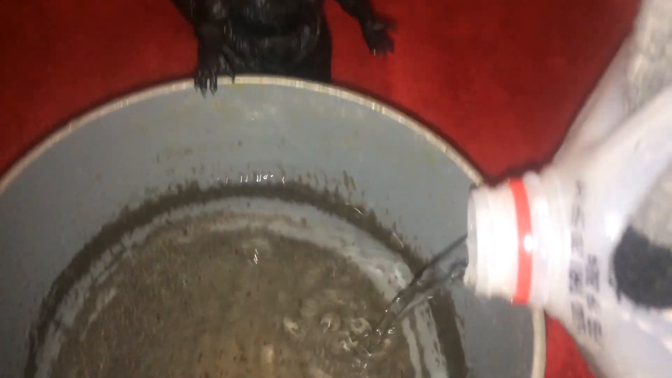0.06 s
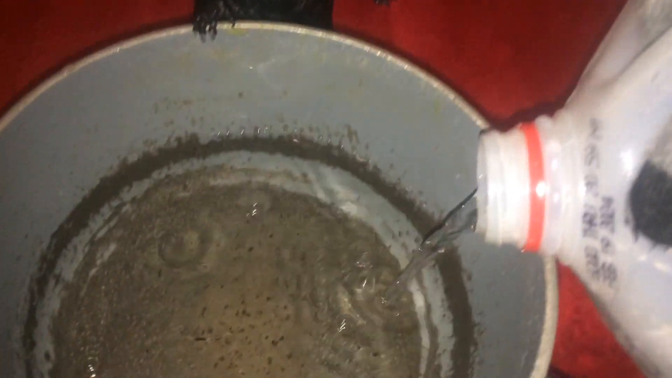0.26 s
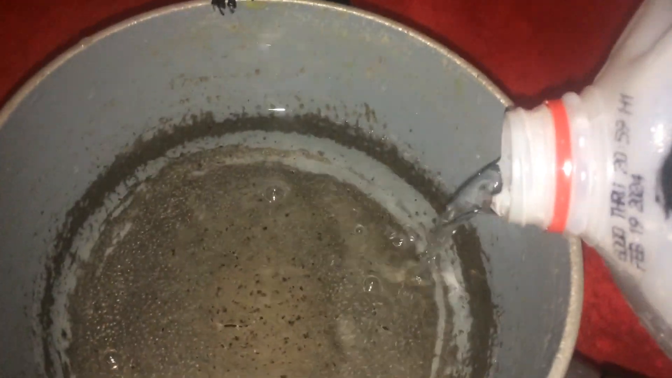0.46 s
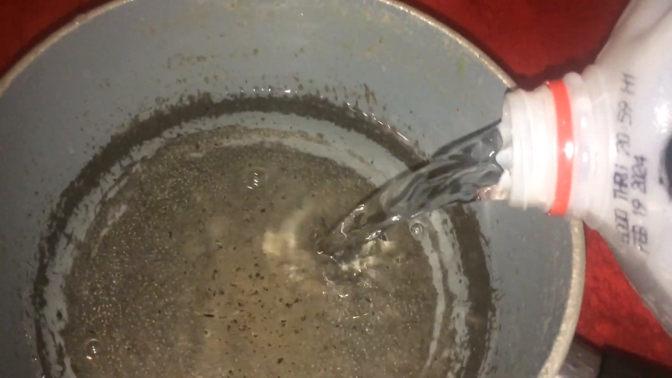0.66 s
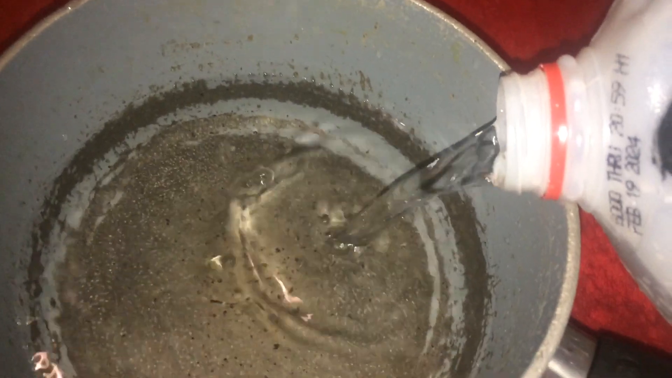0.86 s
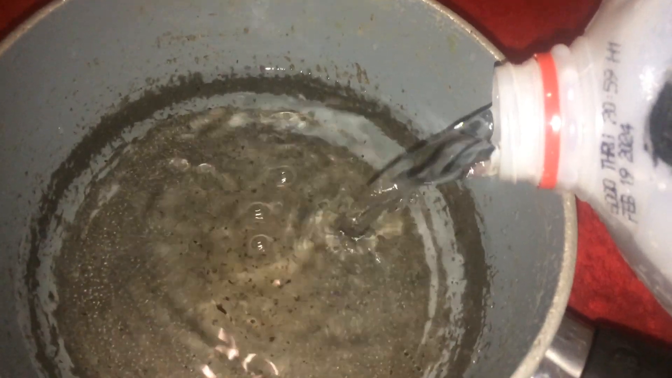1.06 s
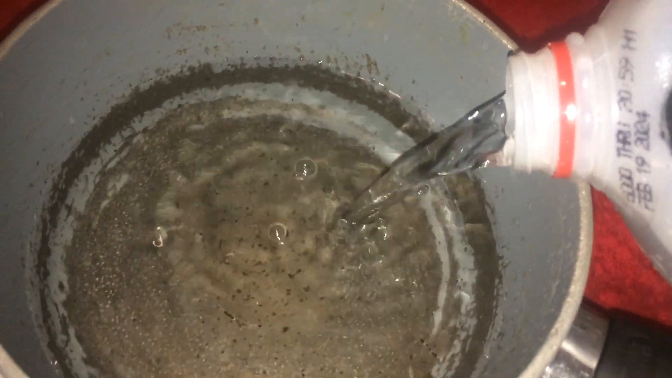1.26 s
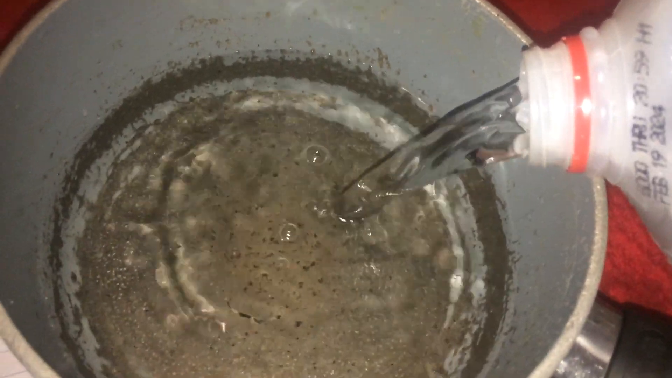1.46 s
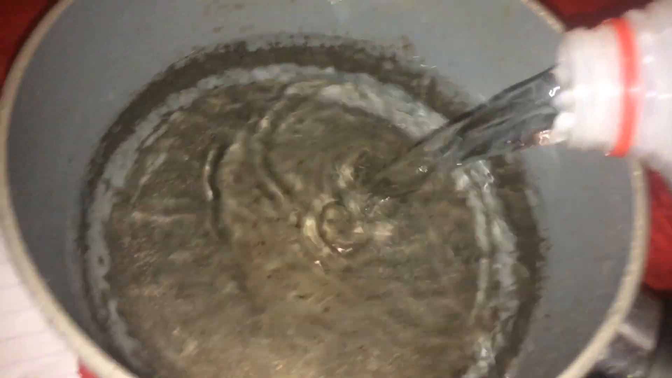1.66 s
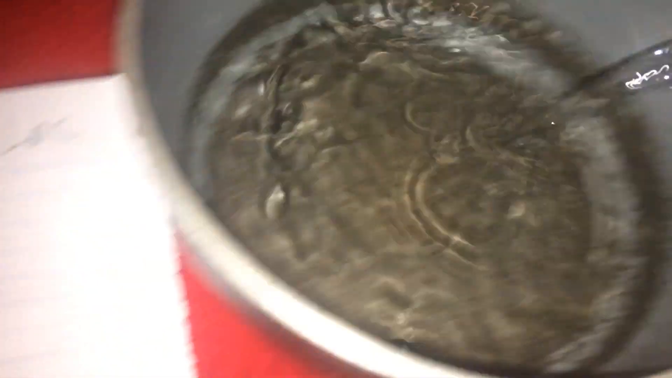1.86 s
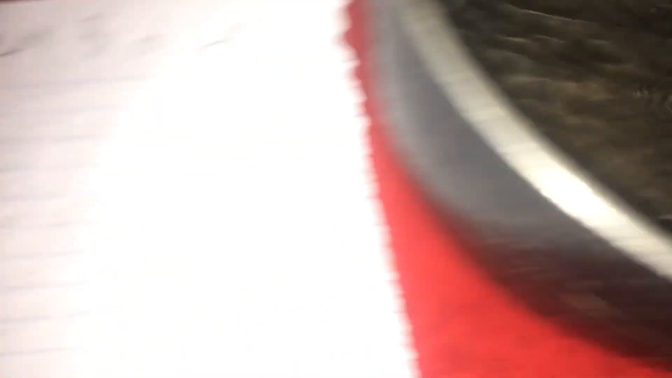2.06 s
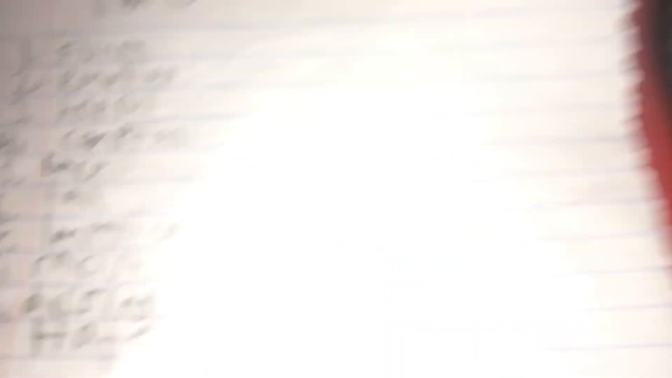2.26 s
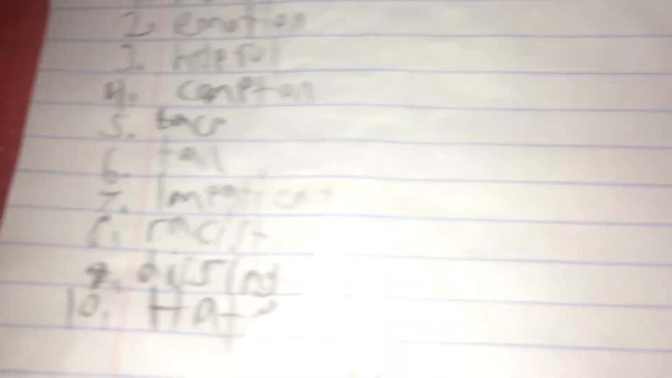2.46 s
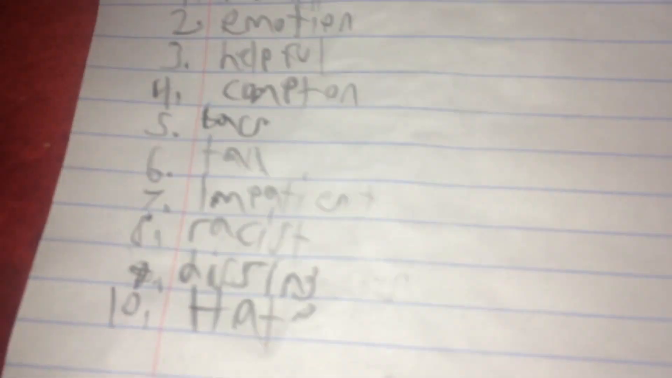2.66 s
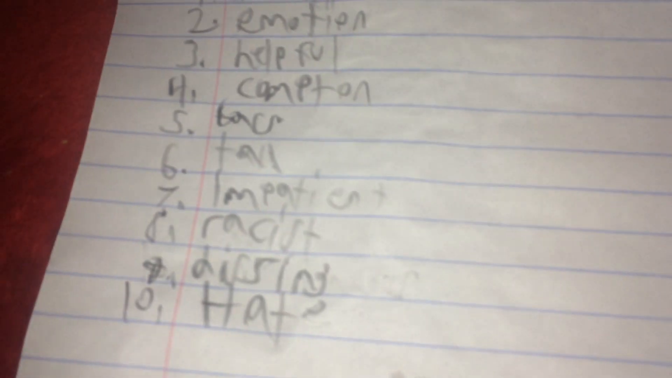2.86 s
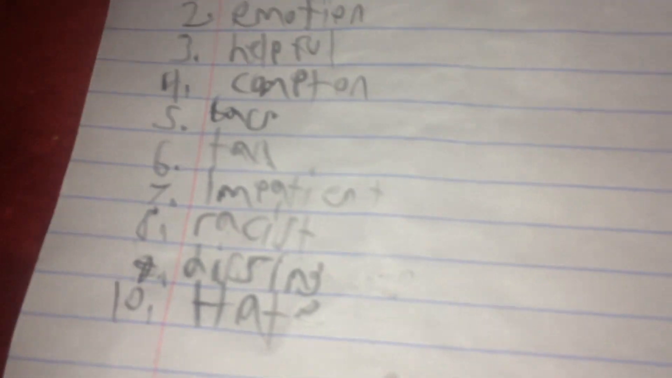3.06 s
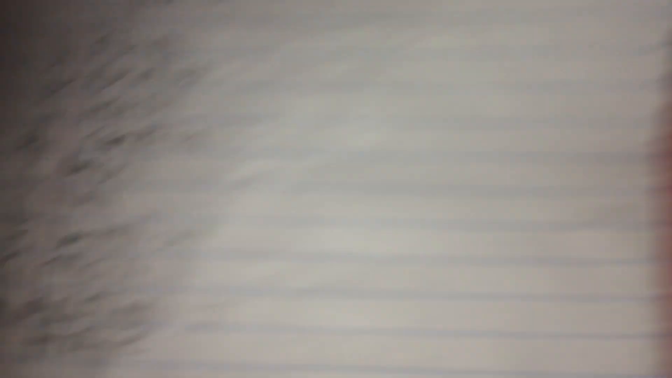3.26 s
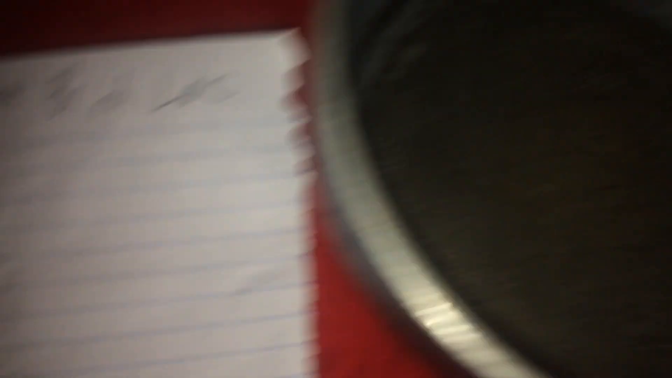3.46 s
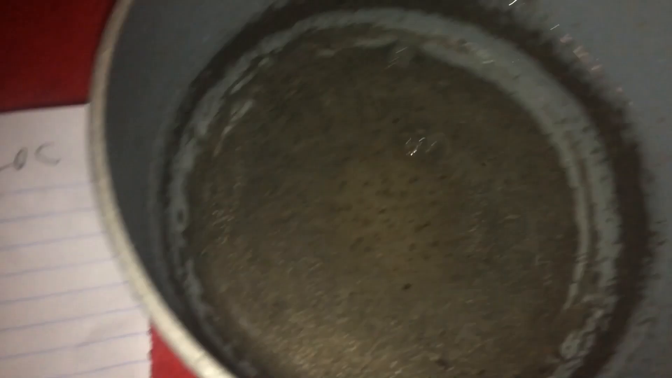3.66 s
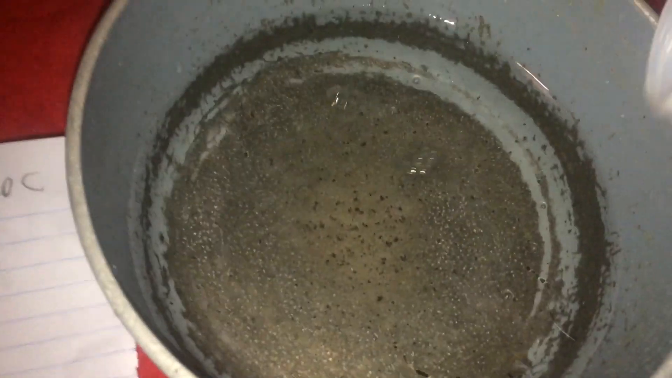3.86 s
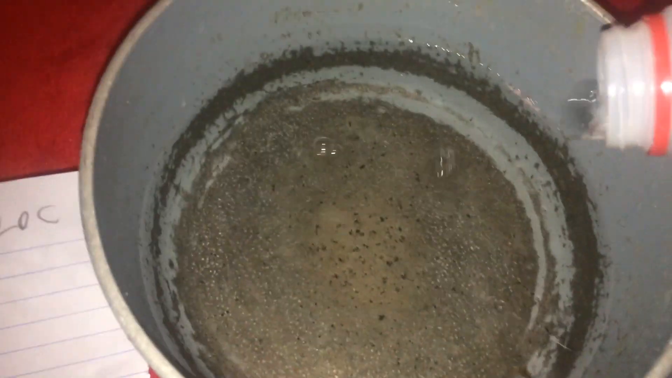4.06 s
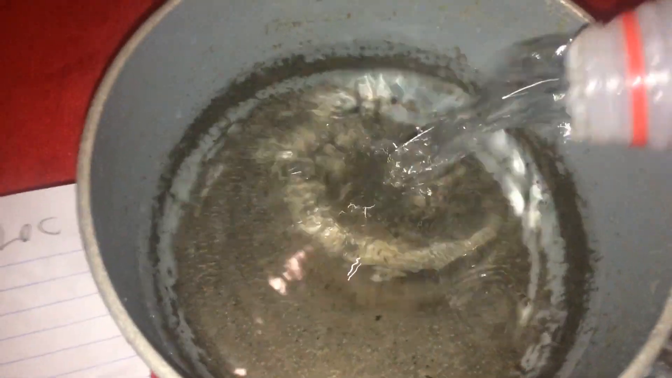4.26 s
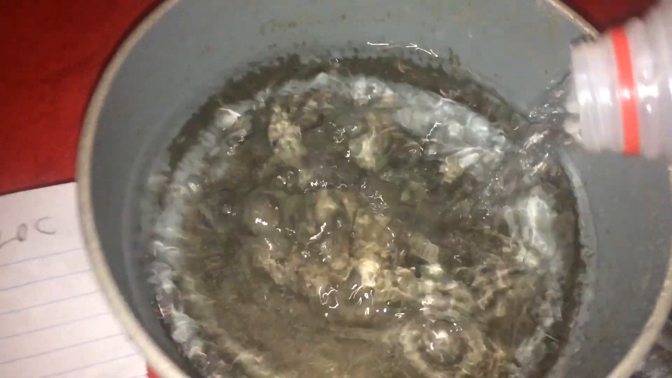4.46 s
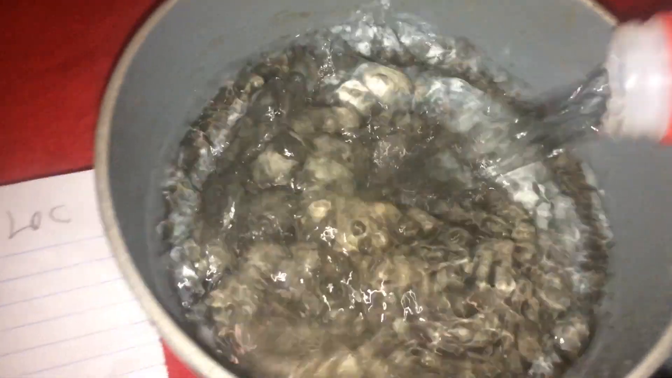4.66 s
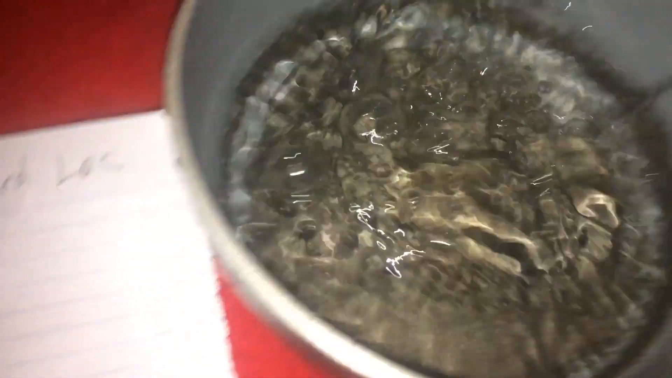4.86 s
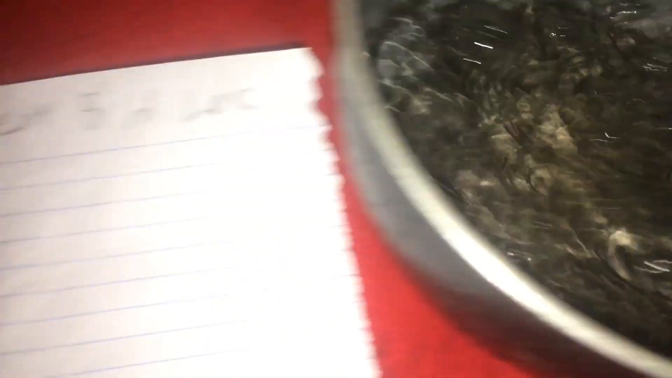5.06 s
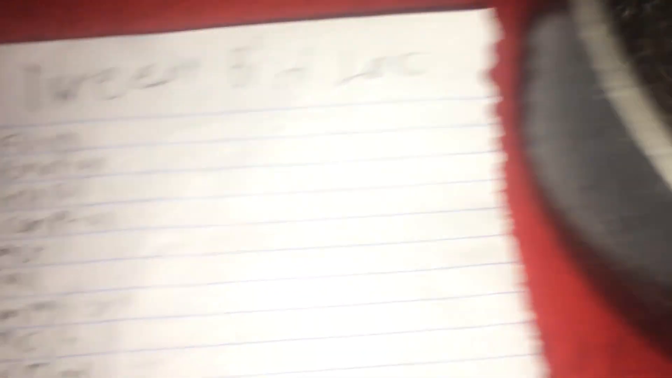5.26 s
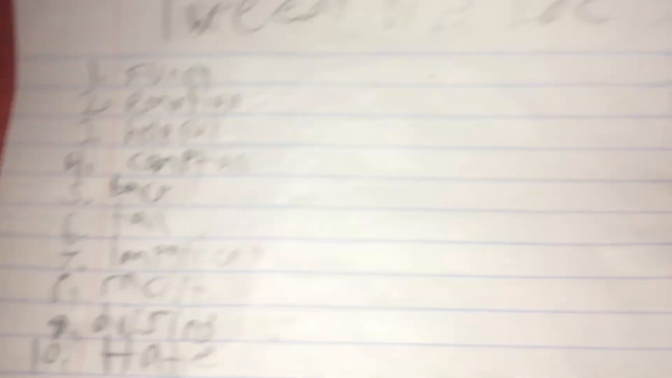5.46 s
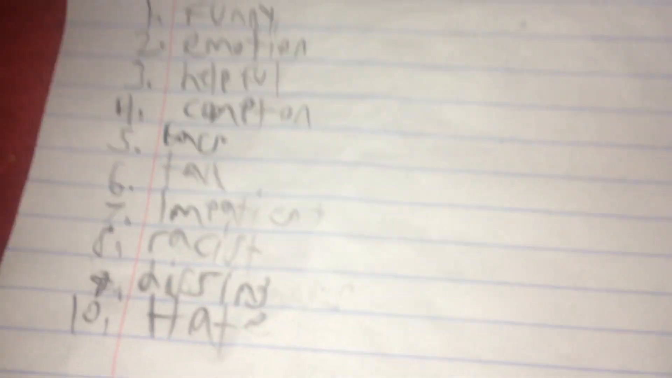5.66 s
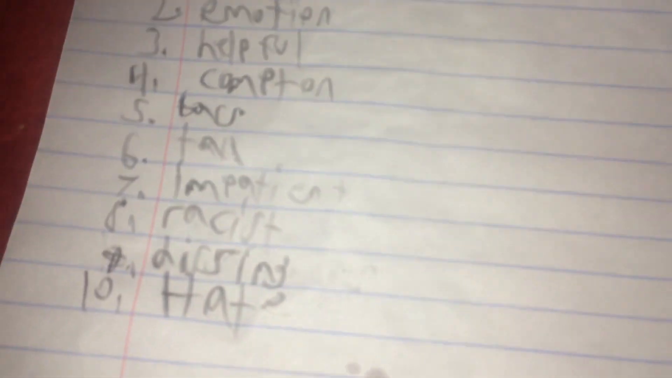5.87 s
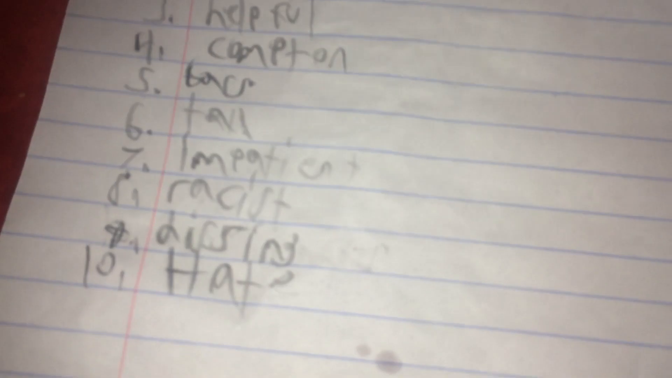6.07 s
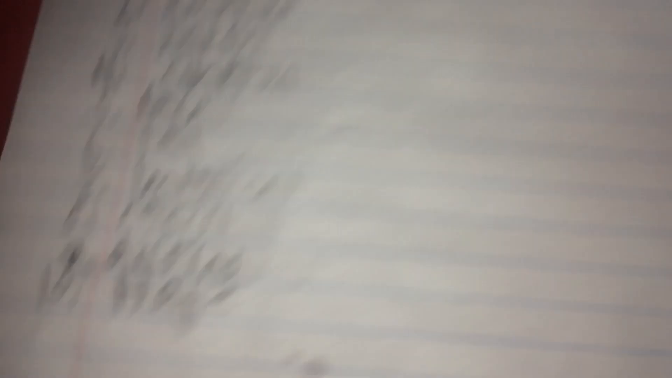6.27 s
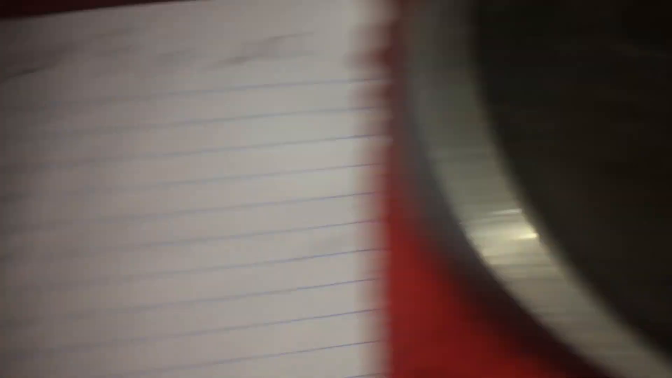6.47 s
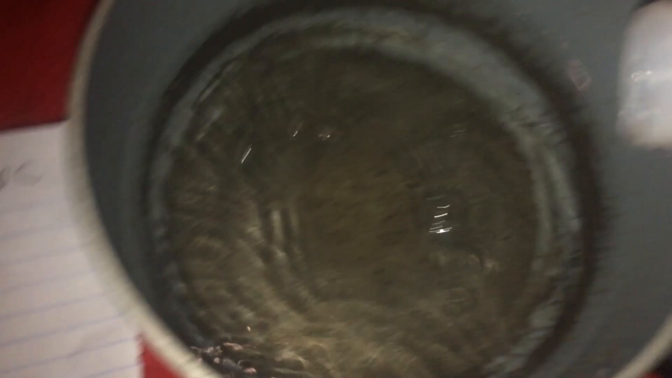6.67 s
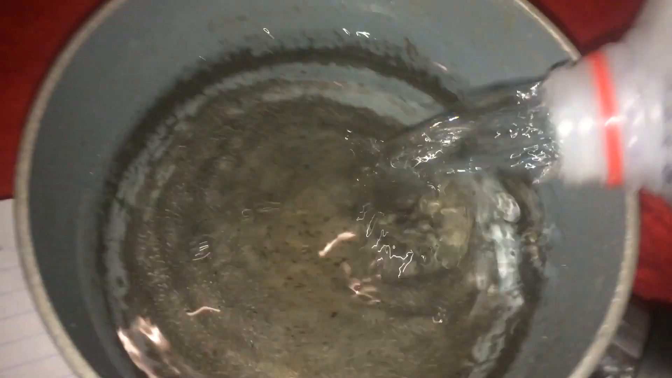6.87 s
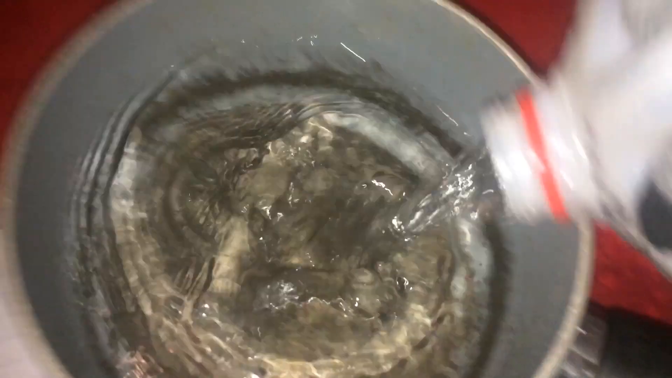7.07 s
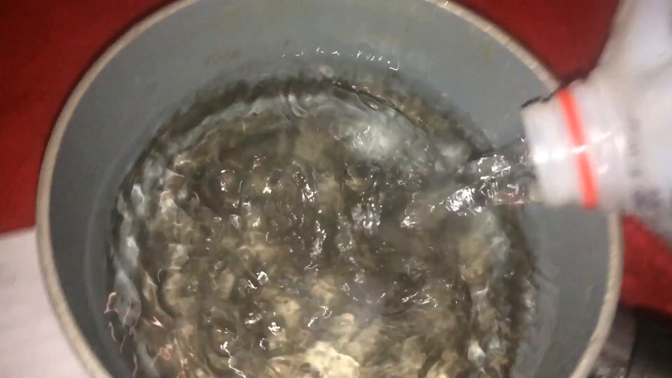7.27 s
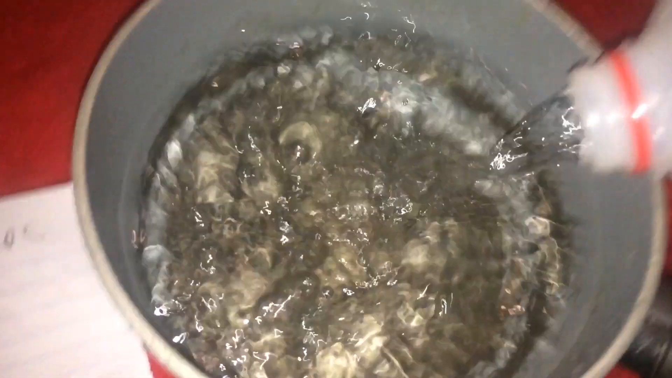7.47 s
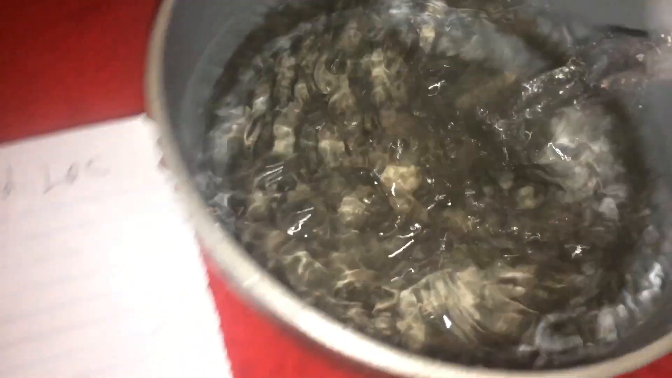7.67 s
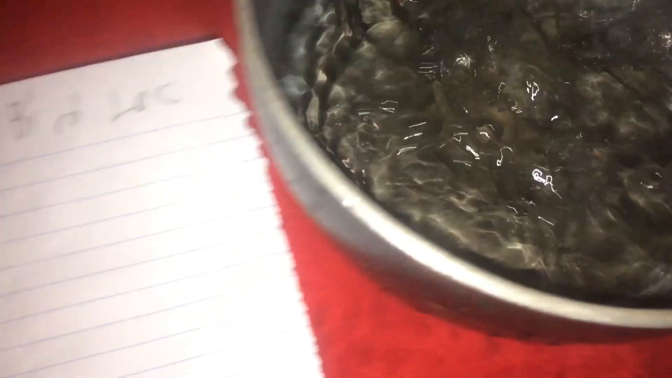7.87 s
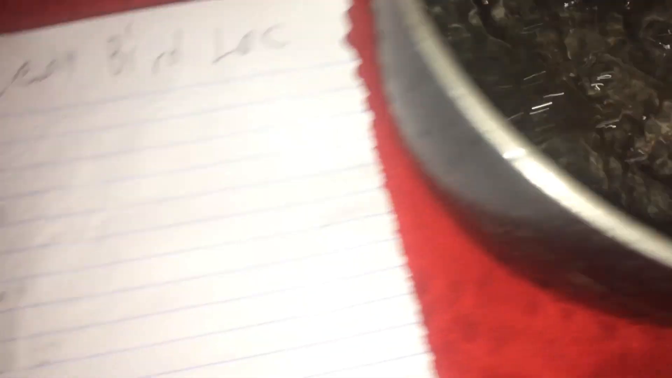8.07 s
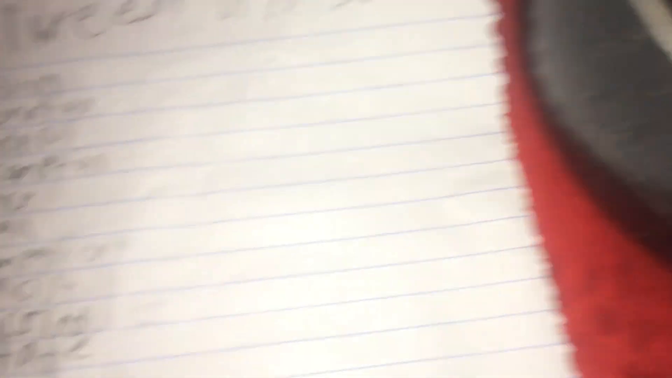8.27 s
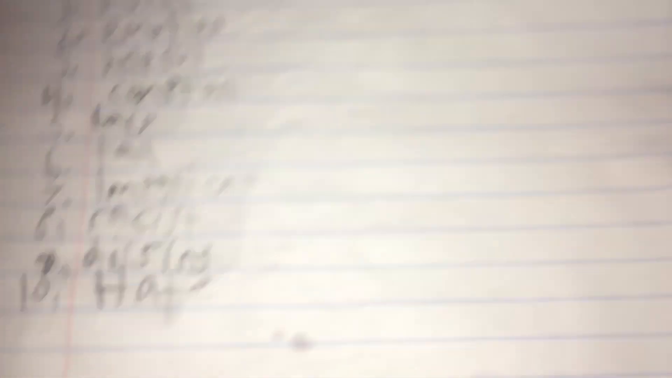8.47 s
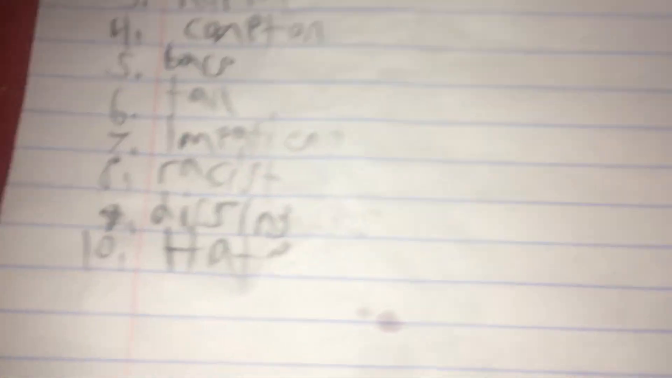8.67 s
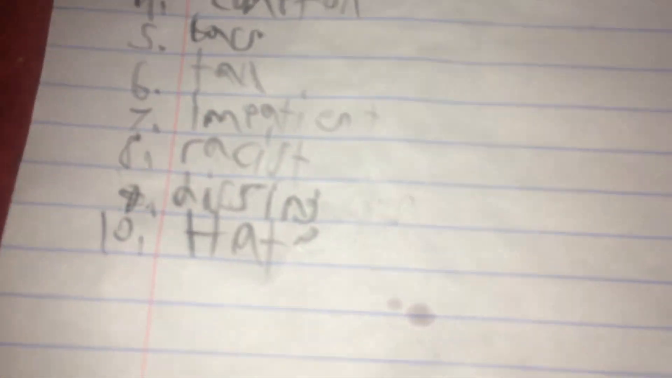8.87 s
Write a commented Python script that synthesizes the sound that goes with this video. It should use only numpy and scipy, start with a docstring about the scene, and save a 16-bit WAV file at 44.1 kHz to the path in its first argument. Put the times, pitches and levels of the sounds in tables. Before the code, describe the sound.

Water trickles from a plastic bottle into a metal pot, then glugs out in two splashing gushes, with knocks on the rim.

```python
"""A refrigerator hums and throbs in a small room while water is poured from a plastic bottle into a metal pot.
First comes a thin trickle of pinging bubbles and ticking drops. The bottle knocks and rubs on the rim,
and at 4.3 s a gush glugs out: slugs of water slap the pool and shake the pot, bubbles ring and rise in
pitch, spray crackles. The pool settles; more knocks and a thud through the table lead into a bigger gush
at 7 s, which laps and fizzes away under a last soft thud."""
import sys
import numpy as np
from scipy import signal
from scipy.fft import rfft, irfft
from scipy.io import wavfile

SR = 44100
rng = np.random.default_rng(int(sys.argv[2]) if len(sys.argv) > 2 else 0)


def dump_mix(stems):
    """Bounce the given channels to the path in sys.argv[1] as a 16-bit WAV at rate SR."""
    frames = np.atleast_2d(stems).T  # one column per channel
    limited = np.clip(frames, -1, 1)  # hard clip at full scale
    pcm = np.round(limited * 32767).astype(np.int16)
    wavfile.write(sys.argv[1], SR, pcm)


N = 393813

# small bubbles: t/s, level/dB, f/Hz
SMALL_BUBBLES = [(0.017, -29, 820), (0.02, -22.5, 10160), (0.043, -38, 3220), (0.269, -34, 6200),
                 (0.319, -37.5, 3300), (0.698, -41.5, 2580), (0.741, -33, 8950), (0.768, -35, 1450),
                 (0.771, -40, 6250), (0.795, -37, 7600), (1.212, -35, 7900), (1.239, -45.5, 2560),
                 (1.239, -40, 6940), (1.432, -43.5, 9000), (1.479, -47, 7100), (1.71, -40.5, 2650),
                 (1.785, -48, 2100), (1.784, -42.5, 6060), (1.823, -39, 5080), (2.067, -35, 3560),
                 (2.069, -35, 10800), (2.195, -26, 9640), (2.206, -48, 4150), (2.225, -27, 6040),
                 (3.795, -41.5, 9450), (4.339, -30, 2700), (4.469, -8, 1920), (4.469, -18, 2900),
                 (4.482, -14.5, 2780), (4.501, -5, 9170), (4.518, -12, 8050), (4.57, -10.5, 5400),
                 (4.574, -11.5, 2700), (4.688, -17, 2610), (4.71, -27, 2430), (4.739, -16, 1450),
                 (4.745, -21.5, 2930), (4.958, -27.5, 6000), (5.127, -18.5, 9040), (7.046, -19.5, 4050),
                 (7.133, -15.5, 2550), (7.142, -8, 3010), (7.149, -5, 9550), (7.152, -16.5, 3940),
                 (7.173, -8.5, 2760), (7.186, -16, 1614), (7.227, -16, 3580), (7.227, -13.5, 10800),
                 (7.232, -12, 5260), (7.243, -18.5, 1720), (7.248, -12.5, 6350), (7.28, -8.5, 1240),
                 (7.392, -11, 1130), (7.467, -19, 2700), (7.495, -23, 2590), (7.501, -16.5, 6240),
                 (7.527, -11.5, 925), (7.655, -31.5, 3800), (7.675, -3.5, 1344), (7.849, -19.5, 3310),
                 (7.866, -28, 3200), (7.905, -14.5, 8890), (7.916, -5.5, 2800), (7.921, -10, 9300),
                 (7.936, -24, 920), (7.953, -22.5, 3320), (8.005, -15.5, 7700), (8.034, -26, 3160),
                 (8.175, -29, 3270), (8.323, -38, 2870), (8.414, -28.5, 4620)]
# the pot's low modes, damped by the water: f/Hz, level/dB, t60/s
POT_LOW_MODES = [(72, -12.5, 0.085), (148.5, 1, 0.053), (197, 4, 0.081), (224.1, -2, 0.091),
                 (266, 0.5, 0.064), (321, -1, 0.045), (426, -0.5, 0.054), (503, -8.5, 0.016)]


def from_db(db):
    """Decibels to gain."""
    return 10 ** (np.asarray(db) / 20)


def unit_rms(x):
    """Scale to an rms of 1."""
    return x / np.sqrt(np.mean(x ** 2) + 1e-20)


def fader(points):
    """Gain that follows points of t/s, level/dB."""
    times, levels_db = np.transpose(points)
    return from_db(np.interp(np.arange(N) / SR, times, levels_db))


def coloured_noise(spectrum):
    """Noise shaped by points of f/Hz, level/dB."""
    hz, level_db = np.transpose(spectrum)
    grid_hz = np.maximum(np.arange(N // 2 + 1) * SR / N, 1)
    gain = from_db(np.interp(np.log(grid_hz), np.log(hz), level_db))
    return irfft(rfft(rng.standard_normal(N)) * gain, N)


def band(x, low_hz, high_hz):
    """Butterworth band-pass."""
    return signal.sosfilt(signal.butter(2, [low_hz, high_hz], "band", fs=SR, output="sos"), x)


def drift(rate_hz):
    """Smooth random wander of spread 1."""
    pole = np.exp(-80 * np.pi * rate_hz / SR)
    slow = signal.lfilter([1], [1, -2 * pole, pole * pole], rng.standard_normal(N // 40 + 2002))[2000:]
    return np.interp(np.arange(N) / 40, np.arange(len(slow)), unit_rms(slow))


def bursts(times, levels_db, t60, rise_s):
    """Envelope that jumps at each time and dies away."""
    clicks = np.zeros(N)
    np.add.at(clicks, (times * SR).astype(int), from_db(levels_db))
    decays = signal.lfilter([1], [1, -from_db(-60 / (t60 * SR))], clicks + 1e-18)
    soft = np.exp(-1 / (rise_s * SR))
    return signal.lfilter([1 - soft], [1, -soft], decays)


def swells(rows, rise_db_per_s, fall_db_per_s):
    """Envelope that climbs to each level, holds and falls away."""
    t = np.arange(N) / SR
    return sum(from_db(db - rise_db_per_s * np.maximum(s - t, 0)
                       - fall_db_per_s * np.maximum(t - s - hold, 0)) for s, hold, db in rows)


def resonate(force, modes):
    """A force rings damped modes of alternating sign."""
    out = np.zeros(N)
    for k, (hz, level_db, t60) in enumerate(modes):
        r, w = from_db(-60 / (t60 * SR)), 2 * np.pi * hz / SR
        ring = signal.lfilter([0, np.sin(w)], [1, -2 * r * np.cos(w), r * r], force + 1e-18)
        out += (-1) ** k * from_db(level_db) * ring
    return out


def add_ping(out, s, hz, gain, t60, glide):
    """Mix in a sine that swells quickly and dies while its pitch moves by the share `glide`."""
    t = np.arange(int(t60 * SR)) / SR
    envelope = (1 - np.exp(-t / (0.6 / hz + .0004))) * from_db(-60 * t / t60)
    tone = np.sin(2 * np.pi * hz * (t + glide / 2 * t * t / t60))
    start = int(s * SR)
    out[start:start + len(t)] += (gain * envelope * tone)[:N - start]


def fridge():
    """Compressor hum and casing rattle throb together as the rotor slips against the mains field."""
    # compressor lines: f/Hz, level/dB
    hum_lines = [(59.2, -16), (119.8, 3.5), (177.6, -9.5), (239.6, -21), (359.6, -16.5), (479, -32.5)]
    # bands of the casing rattle: low f/Hz, high f/Hz, level/dB
    rattle_bands = [(1150, 2000, -24), (3060, 3100, -37)]
    # slow ride of the overall level: t/s, level/dB
    level_ride = [(0, -58), (1.5, -56), (2, -52.5), (3.5, -52.5), (3.9, -55.5), (5, -52.5), (8.93, -54)]
    mains_hz, slip_hz, crest_s = 59.85, 1.87, 4.485
    t = np.arange(N) / SR
    throb = np.cos(2 * np.pi * slip_hz * (t - crest_s))
    hum = sum(from_db(level_db + drift(5.1)) * (1 + (.75 if hz > 300 else .22) * throb)
              * np.sin(2 * np.pi * (hz * t + rng.random())) for hz, level_db in hum_lines)
    taps = np.diff(np.floor(mains_hz * t), prepend=0) + .045 * rng.standard_normal(N)   # one per cycle
    rattle = sum(from_db(db) * unit_rms(band(taps, low, high)) for low, high, db in rattle_bands)
    return fader(level_ride) * (np.sqrt(2) * hum + (1 + throb) * rattle)


def room_air():
    """A faint, bass-heavy bed of room tone."""
    # spectrum of the air: f/Hz, relative level/dB
    air_spectrum = [(20, -38.5), (33, -23), (42, -8.5), (60, -3.5), (85, -7), (200, -15), (400, -25.5),
                    (600, -25.5), (3000, -35), (12000, -42.5), (16500, -46.5)]
    return from_db(-63.5) * unit_rms(coloured_noise(air_spectrum))


def splash_noise():
    """Mid-heavy noise, the raw stuff of splashes, knocks and rubs."""
    # spectrum of a splash: f/Hz, relative level/dB
    splash_spectrum = [(300, -31), (500, 2), (2900, -4), (4500, -12), (9500, -18.5), (14000, -23),
                       (17000, -29)]
    return coloured_noise(splash_spectrum)


def spatter():
    """A mid wash and a high hiss, both broken up by drops bursting at random."""
    drops_per_s, spread_db = 90, 5.5
    born = np.flatnonzero(rng.random(N) < drops_per_s * from_db(4 * drift(12)) / SR)
    levels_db = spread_db * np.minimum(rng.exponential(1, len(born)), 4)
    drops = unit_rms(bursts(born / SR, levels_db, t60=0.015, rise_s=0.00022))
    noise = splash_noise()
    wash = band(noise, 500, 3300) * (1.5 + drops) * from_db(5 * drift(22))
    hiss = band(noise, 3500, 19000) * (.6 + drops) * from_db(4.5 * drift(18))
    return unit_rms(wash), unit_rms(hiss)


def swarm(active, low_hz, high_hz, per_s, cycles, spread_db, glide):
    """A crowd of bubbles born in random clumps while `active`, about rms 1 there."""
    out = np.zeros(N)
    born = np.flatnonzero(rng.random(N) < active * per_s * from_db(5 * drift(15)) / SR)
    for s in born / SR:
        pitch, size = rng.random(2)
        hz = low_hz * (high_hz / low_hz) ** pitch
        add_ping(out, s, hz, from_db(-spread_db * np.log(size + 0.18)), cycles / hz, glide)
    return unit_rms(out) * np.sqrt(np.mean(active))


def pours(wash, hiss):
    """The stream churns up gurgle and spray; droplets break off the opening trickle and patter."""
    # flow into the pool, one curve per pour: t/s, level/dB
    flow_curves = [
        [(0, -50), (.12, -75.5), (.45, -99), (.77, -67.5), (1.0, -88), (1.3, -75), (1.9, -79), (2.23, -67),
         (2.32, -77)],
        [(4.3, -67), (4.43, -38), (4.6, -37.5), (4.76, -40), (4.8, -64.5), (4.9, -51.5), (4.94, -40.5),
         (5.0, -60.5), (5.2, -65.5), (5.4, -93.5)],
        [(7.0, -61), (7.06, -37), (7.3, -34.5), (7.53, -37), (7.65, -62.5), (7.7, -37.5), (7.88, -47),
         (7.94, -33.5), (8.0, -62), (8.4, -69)],
    ]
    # spray against gurgle, one per pour: level/dB
    spray_db = (2, -1, -6)
    t = np.arange(N) / SR
    flows = [fader(curve) * (t >= curve[0][0]) * (t <= curve[-1][0]) for curve in flow_curves]
    flow, trickle = sum(flows), flows[0]
    gurgle = swarm(flow > 0, 500, 3300, per_s=230, cycles=30, spread_db=3.5, glide=.6) + .6 * wash
    spray = .7 * swarm(flow > 0, 3500, 13000, per_s=150, cycles=55, spread_db=5, glide=.26) + hiss
    patter = swarm(trickle > 0, 3000, 10000, per_s=30, cycles=50, spread_db=4.5, glide=.16)
    return flow * gurgle + np.dot(from_db(spray_db), flows) * spray + trickle * patter


def bubbles():
    """Single bubbles chirp upward, smaller ones higher and shorter; large pockets glug. All flutter."""
    # large air pockets: t/s, level/dB, f/Hz, t60/s, glide as a share of the pitch
    glugs = [(0.809, -50, 1587, 0.093, -0.36), (2.268, -32, 1372, 0.095, -0.18),
             (4.342, -29.5, 390.6, 0.27, 0.2), (4.486, -30, 555, 0.087, 0.49),
             (4.59, -23, 423, 0.12, -0.077), (4.675, -25, 610, 0.24, 0.96), (4.768, -16.5, 522, 0.1, -0.15),
             (4.825, -29.5, 753, 0.082, 0.086), (4.83, -28, 993, 0.087, 1.0), (7.039, -25, 623, 0.1, 0.7),
             (7.275, -16.5, 411.6, 0.18, 0.56), (7.278, -13, 172.5, 0.24, 0.74),
             (7.678, -11.5, 186, 0.2, 0.13), (7.33, -28, 643, 0.31, 1.3), (7.527, -23.5, 590, 0.09, -0.032),
             (7.565, -23.5, 1002, 0.079, -0.12), (7.636, -35, 1675, 0.1, 0.32),
             (7.675, -1.5, 401, 0.025, 0.68), (7.83, -32.5, 434, 0.47, 1.2),
             (8.098, -24, 1406, 0.039, 0.76)]
    out = np.zeros(N)
    for s, level_db, hz in SMALL_BUBBLES:
        add_ping(out, s, hz, from_db(level_db), t60=0.033 * (hz / 1000) ** -0.67, glide=0.28)
    for s, level_db, hz, t60, glide in glugs:
        add_ping(out, s, hz, from_db(level_db), t60, glide)
    wobble = from_db(3 * drift(80))
    return out * wobble


def ticks():
    """Tiny drops burst in bright puffs: accents, one with each small bubble, and a faint crackle."""
    # drops bursting at the surface: t/s, level/dB
    accents = [(0.0767, -46), (0.405, -55), (.6649, -50), (0.7798, -40.5), (1.5506, -55), (2.125, -49),
               (2.234, -25.5), (4.449, -22.5), (4.623, -20.5), (4.763, -24), (4.853, -30), (5.058, -41),
               (5.198, -44.5), (5.295, -52.5), (5.35, -63), (5.553, -58), (6.607, -50), (7.207, -26),
               (7.227, -16.5), (7.241, -25), (7.365, -26), (7.435, -34)]
    accent_s, accent_db = np.transpose(accents)
    bubble_s, bubble_db, _ = np.transpose(SMALL_BUBBLES)
    stray_s = np.flatnonzero(rng.random(N) < 9 / SR) / SR   # about nine a second
    levels_db = np.r_[accent_db, bubble_db - 19, rng.normal(-63, 3, len(stray_s))]
    envelope = bursts(np.r_[accent_s, bubble_s, stray_s], levels_db, t60=0.0054, rise_s=0.00011)
    return envelope * unit_rms(band(rng.standard_normal(N), 7000, 13000))


def struck_pot(impact, times, thump_db):
    """An impact rings the pot's walls, and a softer push at each time thumps its low modes."""
    # wall modes: f/Hz, level/dB, t60/s
    wall_modes = [(980, -1, 0.06), (1318, -18, .08), (1480, -6, 0.07), (1813, -14, 0.04), (2810, -14, .04)]
    push = bursts(times, thump_db, t60=0.11, rise_s=0.0067) * rng.standard_normal(N)
    return from_db(-45.5) * resonate(impact, wall_modes) + from_db(-35) * resonate(push, POT_LOW_MODES)


def rim_ring(force):
    """The rim's high modes, sinking steadily in pitch as the pot fills."""
    # rim modes: starting f/Hz, level/dB, t60/s, sink/(Hz per s)
    rim_modes = [(6370, 0, .09, 155), (6680, -2, .055, 157), (9360, -7, .065, 40), (9980, -12, .05, 40)]
    t = np.arange(N) / SR
    out = np.zeros(N)
    for hz, level_db, t60, sink in rim_modes:
        carrier = np.exp(2j * np.pi * (hz * t - sink * t * t / 2))
        envelope = signal.lfilter([1], [1, -from_db(-60 / (t60 * SR))], force / carrier + 1e-18)
        out += from_db(level_db) * np.real(carrier * envelope)
    return out


def bottle_knocks(ragged, treble):
    """Plastic hits the rim: a hollow knock and a bright crack, with pot and rim ringing. One row, at 6.50 s,
    instead gives the sharp edge of the bottle dragging along the rim."""
    # knocks (the row at 6.50 s gives the sharp edge of a drag along the rim): t/s, then relative level/dB of
    # knock, thump, rim ring, and crack against knock
    hits = [(2.448, -49, -42, -76, -8), (4.010, -30, -26.5, -38, 8.5), (4.076, -49, -54, -65, 0),
            (4.249, -39.5, -26.5, -67, -14), (6.502, -27.5, -16.5, -65.5, 1),
            (6.749, -22.5, -19, -43.5, -11), (6.806, -31.5, -20, -57, -5), (6.854, -30, -21.5, -56, -12.5),
            (6.913, -23, -13, -40.5, -9.5), (6.947, -27.5, -22, -49, -11), (6.999, -43, -34, -53, 1)]
    times, knock_db, thump_db, ring_db, bright_db = np.transpose(hits)
    knock = bursts(times, knock_db - 2, t60=0.053, rise_s=0.00033) * unit_rms(band(ragged, 530, 2080))
    bright = unit_rms(band(ragged, 1770, 4370)) + 0.32 * treble
    crack = bursts(times, knock_db + bright_db, t60=.03, rise_s=0.00014) * bright
    jolts = np.zeros(N)
    jolts[(times * SR).astype(int)] = from_db(ring_db)
    return knock + crack + struck_pot(knock, times, thump_db) + rim_ring(jolts)


def bottle_rubs(rumble):
    """The bottle drags on the rim: a grainy rustle that stirs the pot's low modes and the rim."""
    # drags: t/s, hold/s, level/dB
    drags = [(4.135, 0.013, -52.5), (4.215, 0.035, -53.5), (6.495, 0.012, -46), (6.8, 0.19, -56.5),
             (8.19, 0.0067, -56.5), (8.39, 0.0081, -53)]
    friction = swells(drags, rise_db_per_s=394, fall_db_per_s=449.5)
    noise = splash_noise()
    rustle = unit_rms(band(noise, 1000, 2580)) + from_db(-1.5) * unit_rms(band(noise, 2000, 12000))
    grain = from_db(3 * drift(90))
    rim = rim_ring(from_db(-43.5) * friction * rng.standard_normal(N))
    return friction * (rustle * grain + from_db(7.5) * rumble) + rim


def slaps(ragged, treble):
    """Slugs of water land with a smack and a shorter sizzle, and shake the pot."""
    # slugs landing: t/s, then relative level/dB of smack, thump and sizzle
    slugs = [(4.342, -18.5, -31.5, -23.5), (4.501, -5.5, -43.5, -13.5), (4.535, -7.5, -31, -36.5),
             (4.576, -19, -29, -18), (4.585, -10.5, -27, -34), (4.686, -10, -56.5, -31),
             (4.766, -8, -60, -23.5), (4.828, -20.5, -63, -30), (4.891, -39, -56, -28.5),
             (4.954, -19, -37, -46), (5.126, -38, -38, -33), (7.037, -10, -61, -22.5),
             (7.071, -8, -16.5, -32.5), (7.138, -32, -37, -13.5), (7.208, -16, -13.5, -19),
             (7.257, -2.5, -10, -19.5), (7.28, -1, -9, -19), (7.328, -11, -32, -20.5),
             (7.392, -30, -52.5, -24.5), (7.421, -12.5, -52, -30.5), (7.438, -17.5, -44.5, -43),
             (7.469, -13.5, -28.5, -24), (7.501, -25.5, -32.5, -19.5), (7.53, -36.5, -26, -49.5),
             (7.673, 0.5, -5, -31), (7.739, -12.5, -23, -28.5), (7.769, -7.5, -9.5, -45),
             (7.793, -3, -10, -42), (7.848, -13.5, -33, -20), (7.914, -40.5, -28, -17.5),
             (8.005, -20.5, -70, -34), (8.038, -58.5, -68, -31), (8.097, -52, -63, -29.5),
             (8.16, -34, -56, -35), (8.185, -26.5, -34, -56), (8.382, -23.5, -34, -39),
             (8.448, -32.5, -46, -44)]
    times, smack_db, thump_db, sizzle_db = np.transpose(slugs)
    smack = bursts(times, smack_db - 11.5, t60=0.033, rise_s=0.0017) * unit_rms(band(ragged, 660, 9600))
    sizzle = bursts(times, sizzle_db - 1, t60=0.02, rise_s=0.000095) * treble
    return smack + sizzle + struck_pot(smack, times, thump_db)


def waves(rumble):
    """Waves heave against the pot and swell its low modes above a faint constant floor."""
    # surges: t/s, hold/s, level/dB
    surges = [(4.42, 0.067, -36), (4.545, 0.058, -28), (4.94, 0.043, -38), (7.07, 0.076, -33.5),
              (7.26, 0.093, -30), (7.46, 0.052, -34), (7.69, 0.16, -25)]
    return (swells(surges, rise_db_per_s=700, fall_db_per_s=257) + from_db(-68)) * rumble


def settling(rumble, hiss):
    """After each gush the pool laps and fizzes, slowly fading."""
    # starts of the tails: t/s, relative level/dB
    tails = [(5.0, -51), (8.0, -52.5)]
    fade_db_per_s, lap_db, fizz_db = 14, -12, -12.5
    t = np.arange(N) / SR
    fade = sum(from_db(db - fade_db_per_s * (t - s)) * (t > s) for s, db in tails)
    fizz = swarm(fade > 0, 5500, 12000, per_s=140, cycles=55, spread_db=4, glide=.1)
    fizz += band(hiss, 6000, 16000)
    return fade * (from_db(lap_db) * rumble + from_db(fizz_db) * fizz)


def table_thuds():
    """Soft bumps come through the table as dull, deep thuds."""
    # bumps: t/s, level/dB
    bumps = [(6.752, -30), (8.19, -31)]
    out = np.zeros(N)
    for s, level_db in bumps:
        add_ping(out, s, hz=54, gain=from_db(level_db), t60=.28, glide=0)
    return out


def room_reverb(x, t60=0.12, wet_db=-16):
    """The small room's short, dull, diffuse tail."""
    t = np.arange(int(t60 * SR)) / SR
    tail = band(rng.standard_normal(len(t)), 200, 9000) * from_db(-60 * t / t60) * (t > .004)
    return from_db(wet_db) * signal.fftconvolve(x, tail / np.sqrt(np.sum(tail ** 2)))[:N]


def scene():
    """Refrigerator and room air behind; water, bottle and pot in front with their reverb."""
    wash, hiss = spatter()
    ragged = splash_noise() * from_db(drift(220))
    treble = unit_rms(band(ragged, 5400, 17000))
    rumble = unit_rms(resonate(rng.standard_normal(N) * from_db(6.1 * drift(9.2)), POT_LOW_MODES))
    front = pours(wash, hiss) + bubbles() + ticks()
    front += bottle_knocks(ragged, treble) + bottle_rubs(rumble)
    front += slaps(ragged, treble) + waves(rumble) + settling(rumble, hiss) + table_thuds()
    low_cut = signal.butter(2, 35, "high", fs=SR, output="sos")   # little deep bass is radiated
    front = signal.sosfilt(low_cut, front)
    return (fridge() + room_air() + front + room_reverb(front))[None]


def record(dry):
    """A steep high cut, 60 dB down from 16.9 kHz."""
    return signal.sosfilt(signal.cheby2(18, 60, 16900, fs=SR, output="sos"), dry)


dry = scene()
out = record(dry)
dump_mix(out)
```